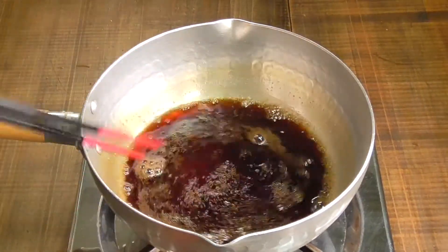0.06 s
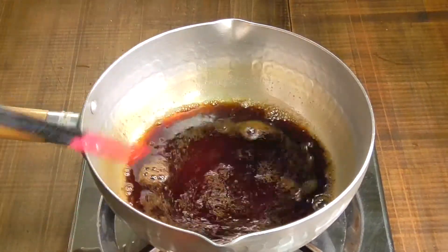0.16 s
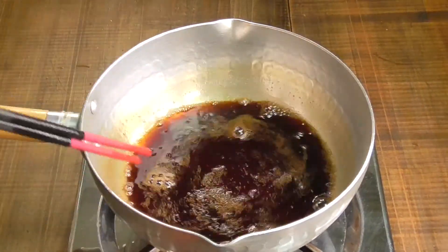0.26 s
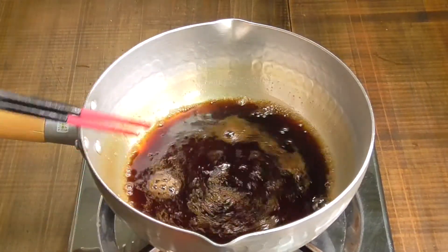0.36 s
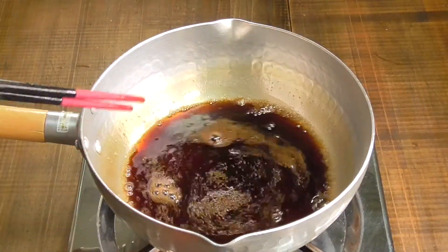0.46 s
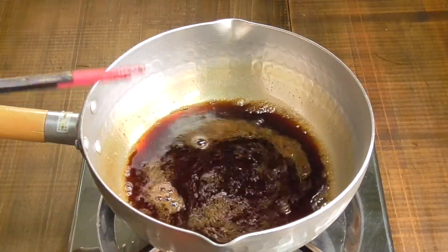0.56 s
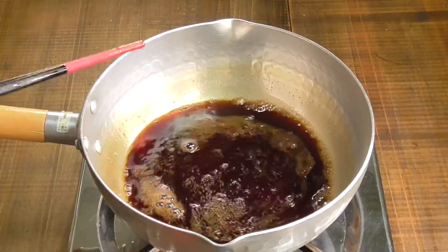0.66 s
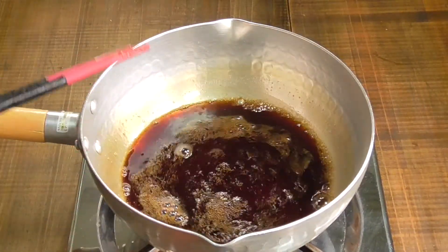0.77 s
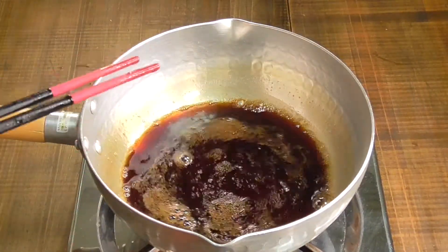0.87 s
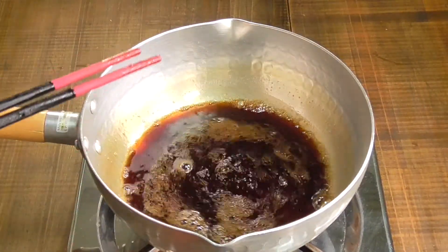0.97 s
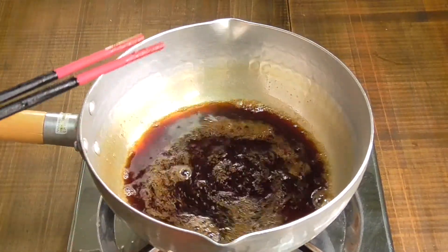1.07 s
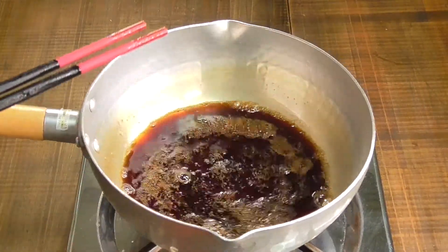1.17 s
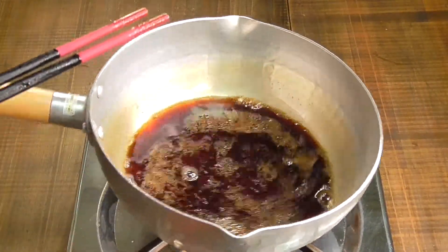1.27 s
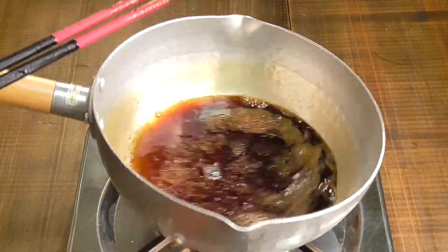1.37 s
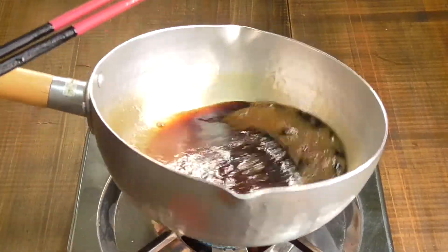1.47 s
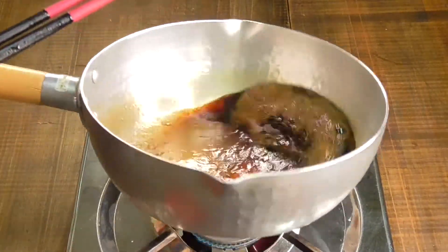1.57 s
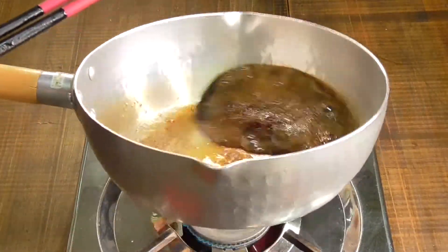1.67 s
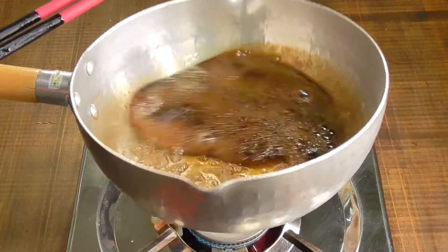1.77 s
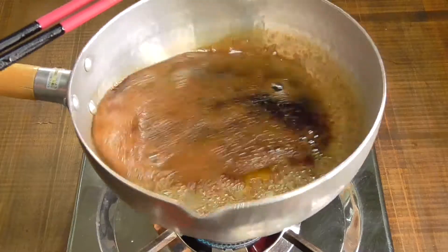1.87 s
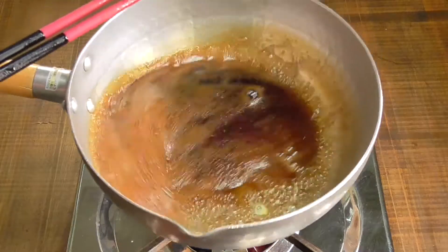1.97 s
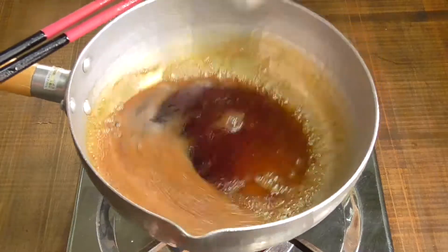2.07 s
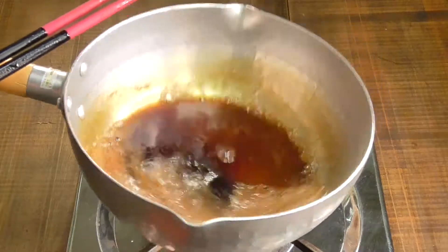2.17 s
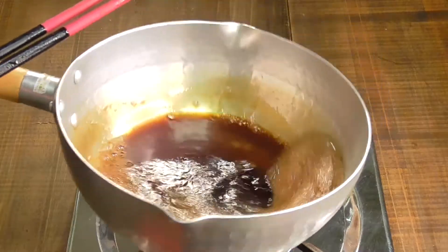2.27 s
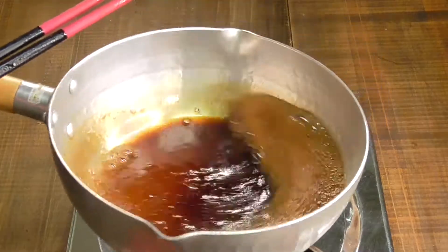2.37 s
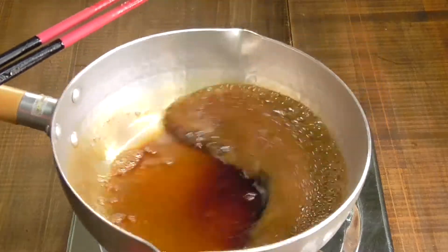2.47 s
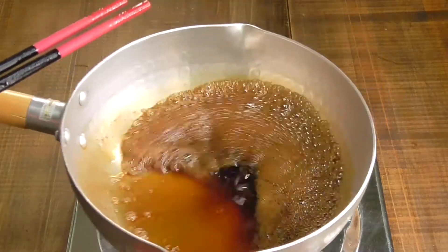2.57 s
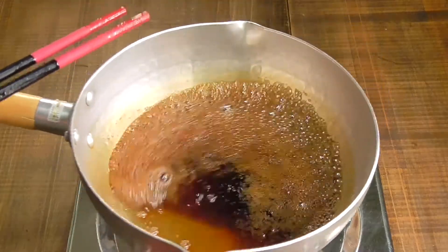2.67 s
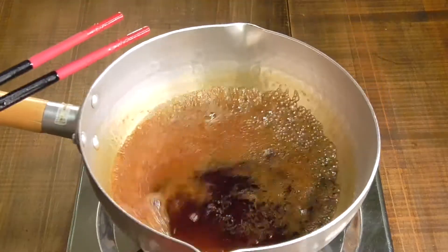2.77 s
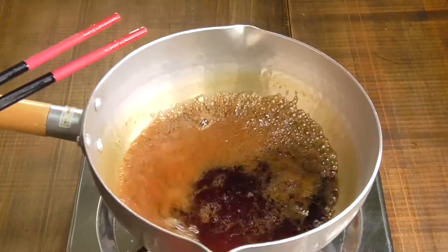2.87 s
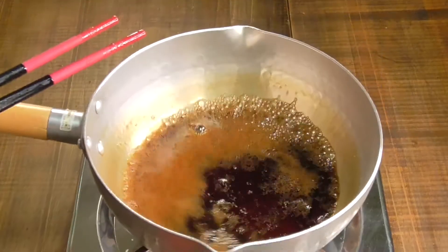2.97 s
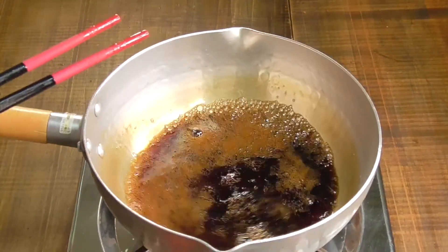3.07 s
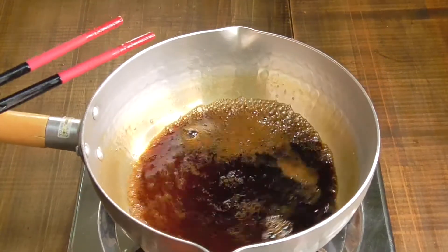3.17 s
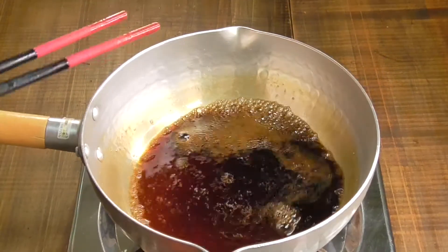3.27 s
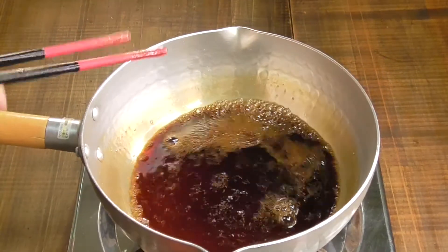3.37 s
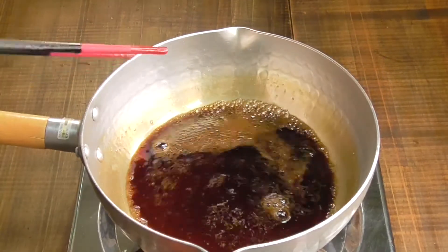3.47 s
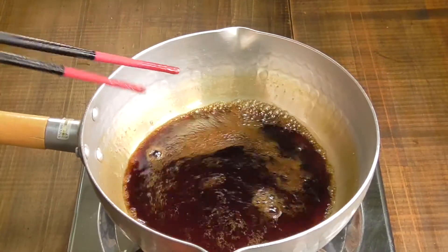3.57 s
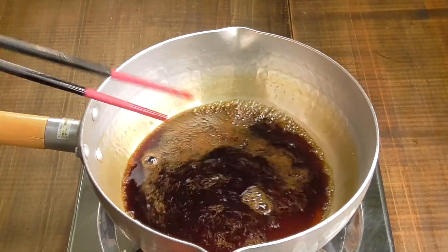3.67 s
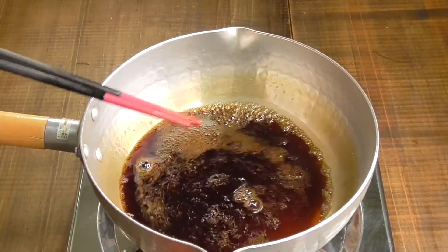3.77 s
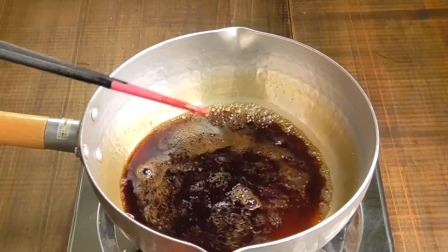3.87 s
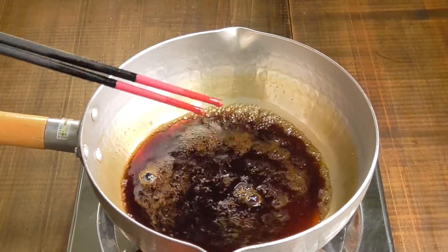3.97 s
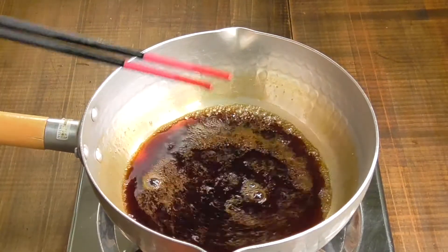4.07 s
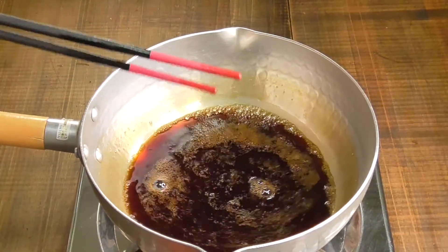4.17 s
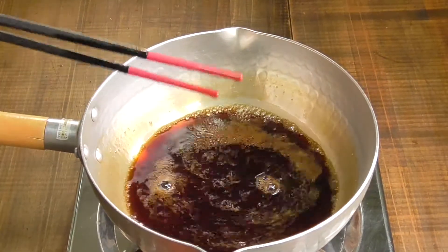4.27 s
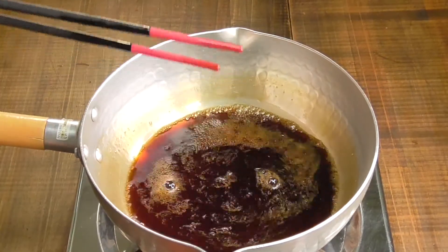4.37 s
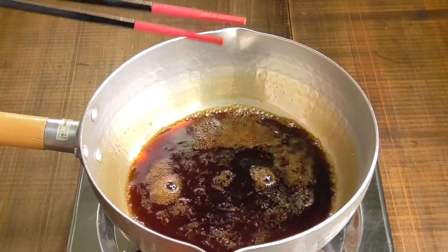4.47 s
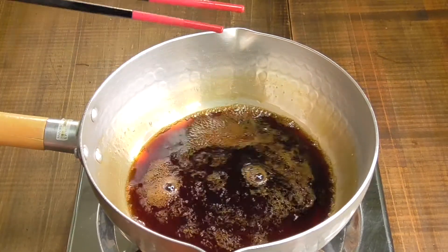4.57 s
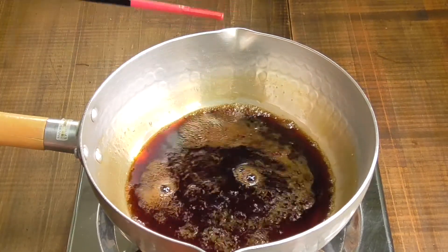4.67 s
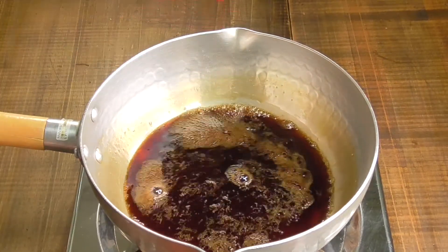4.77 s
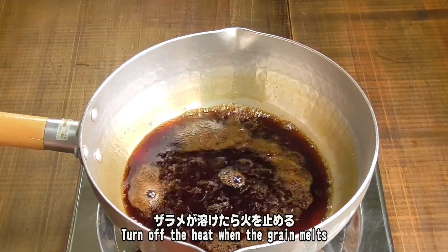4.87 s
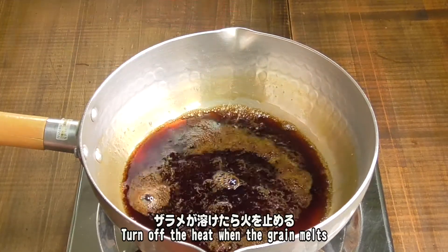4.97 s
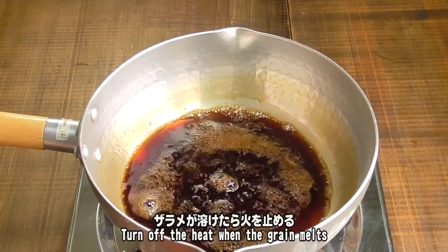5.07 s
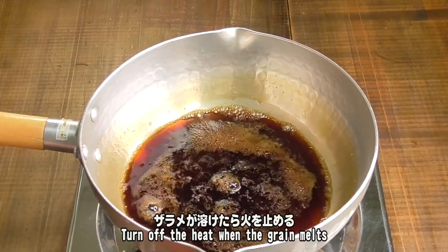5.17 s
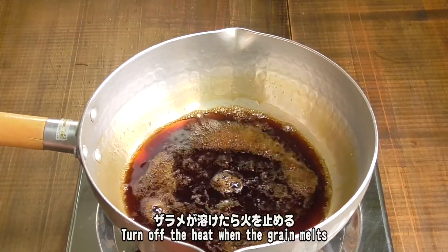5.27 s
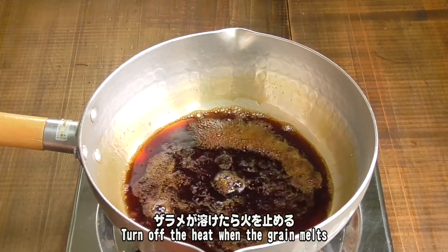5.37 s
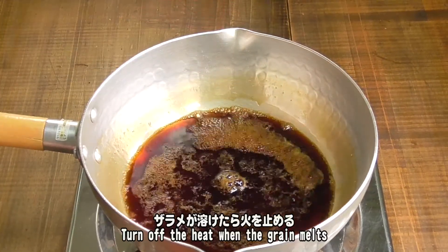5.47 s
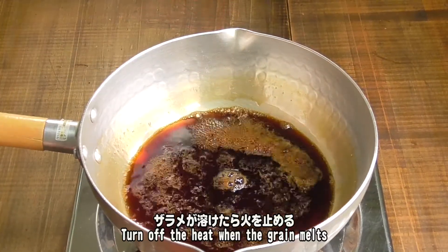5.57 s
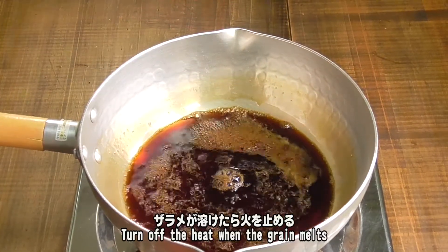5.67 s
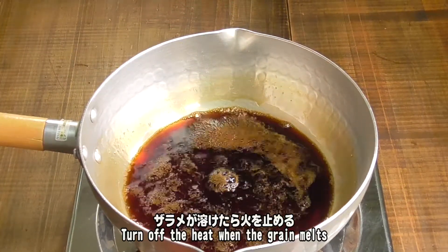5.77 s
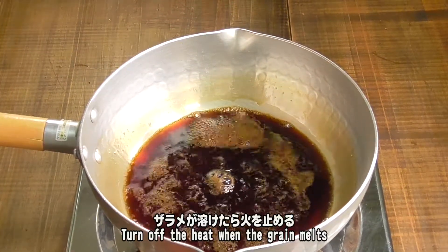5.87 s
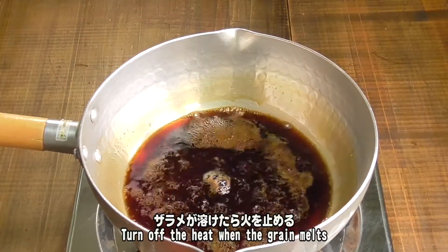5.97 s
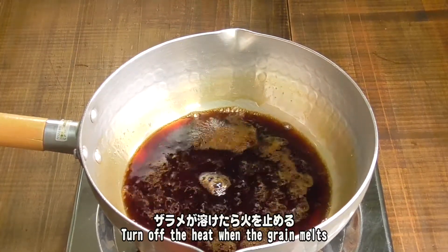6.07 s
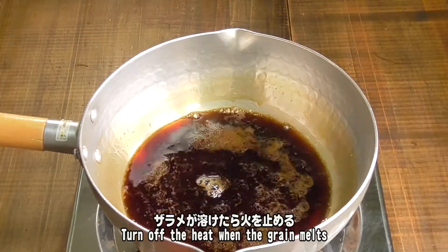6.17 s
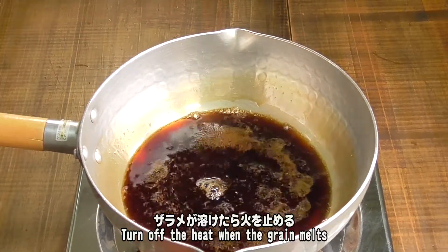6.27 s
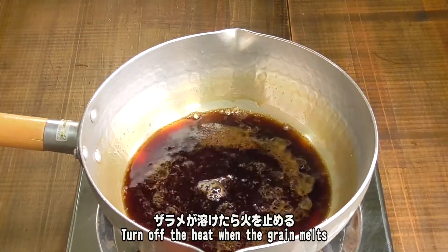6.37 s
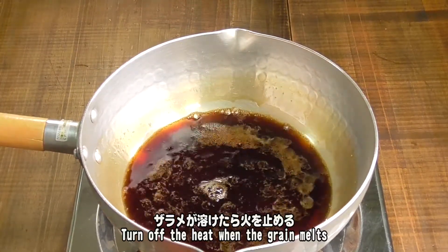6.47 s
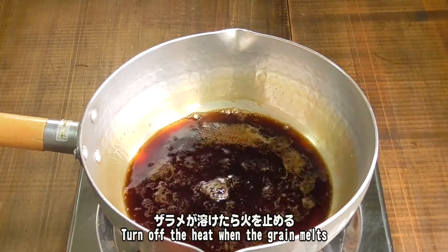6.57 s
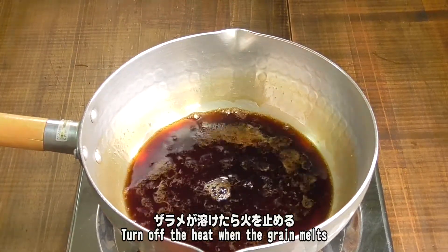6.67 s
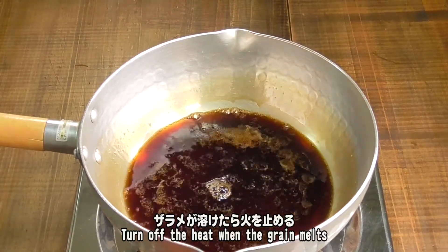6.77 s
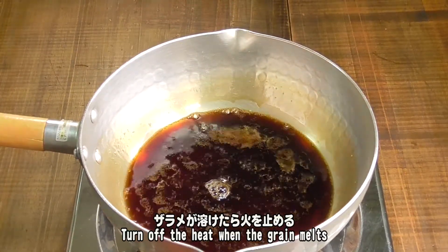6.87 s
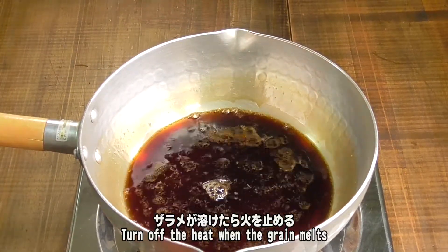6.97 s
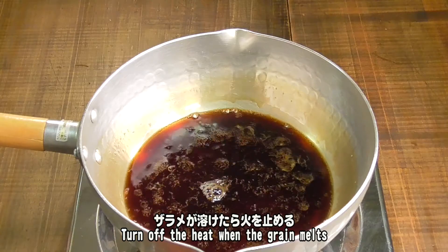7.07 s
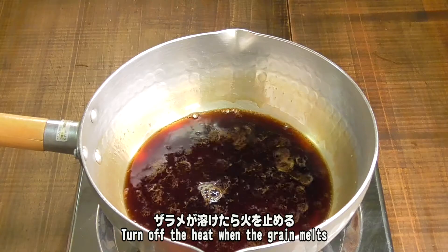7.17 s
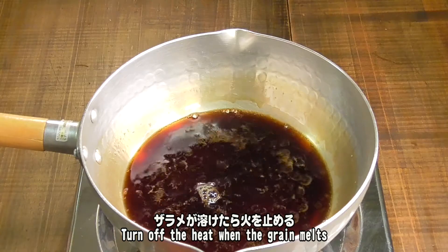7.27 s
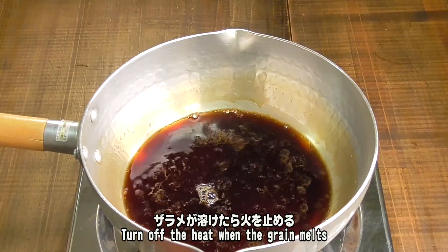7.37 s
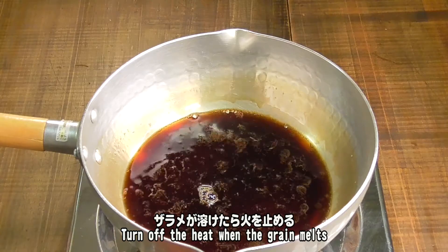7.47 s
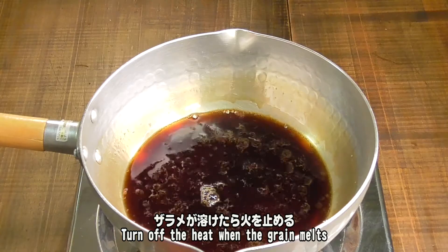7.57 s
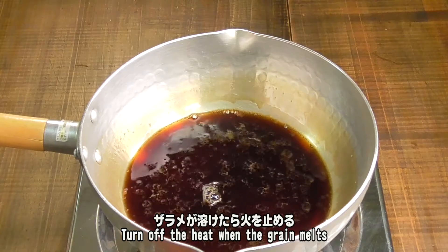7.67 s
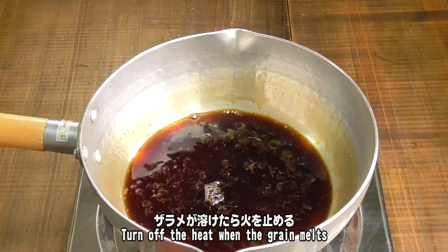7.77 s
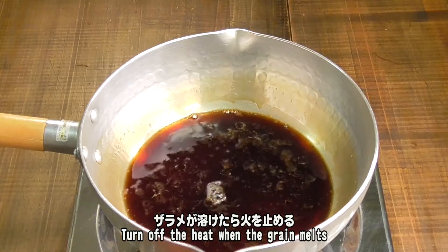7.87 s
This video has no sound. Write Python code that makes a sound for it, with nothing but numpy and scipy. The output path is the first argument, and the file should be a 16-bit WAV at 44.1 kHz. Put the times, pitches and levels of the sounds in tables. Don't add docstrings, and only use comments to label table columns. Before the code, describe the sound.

Sugary sauce boils with steady hiss over a roaring gas burner; a metal pan clanks, is swirled and set down, then the flame clicks off.

```python
import sys
import numpy as np
from scipy import signal
from scipy.fft import rfft, irfft, next_fast_len
from scipy.io import wavfile
from scipy.ndimage import uniform_filter1d, map_coordinates

SR = 44100
rng = np.random.default_rng(int(sys.argv[2]) if len(sys.argv) > 2 else 0)


def magnitude_from_level(level_db):
    exponent = np.asarray(level_db, float) / 20
    return 10 ** exponent


def wrap_up_sound(samples):
    columns = np.atleast_2d(samples).T
    tamed = np.clip(columns, -1, 1)
    steps = np.round(tamed * 32767).astype(np.int16)
    wavfile.write(sys.argv[1], SR, steps)


N = 349404


def seconds(count=N):
    return np.arange(count) / SR


def unit(x):
    return x / np.sqrt(np.mean(x ** 2) + 1e-20)


def along(points, hz):
    point_hz, value = np.transpose(points)
    return np.interp(np.log(hz + 1), np.log(point_hz + 1), value)


def coloured(points):
    return lambda hz: magnitude_from_level(along(points, hz))


def curves(rows):
    s, *columns = np.transpose(rows)
    return [np.interp(seconds(), s, column) for column in columns]


def wobble(rate, count=N):
    knots = rng.standard_normal(int(count * rate / SR) + 4)
    return map_coordinates(knots, [np.arange(count) * rate / SR])


def filtered(x, response):
    n = x.shape[-1]
    m = next_fast_len(n + 8192)
    return irfft(rfft(x, m) * response(np.fft.rfftfreq(m, 1 / SR)), m)[..., :n]


def resonances(modes):
    def response(f):
        total = 0
        for k, (centre, width, db) in enumerate(modes):
            damping = 1j * f * width
            total = total + (-1) ** k * magnitude_from_level(db) * damping / (centre * centre - f * f + damping)
        return total
    return response


# (frequency [Hz], left-right correlation [-1 to 1])
LIKENESS = [(60, 0.14), (130, 0.137), (290, 0.26), (640, 0.56), (1410, 0.56), (3100, 0.82), (6820, 0.54),
            (15000, 0.29)]


def spread(pair, gain):
    def mid_side_gain(hz):
        angle = np.arccos(np.clip(along(LIKENESS, hz), -1, 1)) / 2
        return gain(hz) * np.array([np.cos(angle), np.sin(angle)])
    mid, side = filtered(pair, mid_side_gain)
    return unit(np.array([mid + side, mid - side]))


def patchy(depth_db):
    z = signal.stft(rng.standard_normal((2, N)), nperseg=512)[2]
    field = uniform_filter1d(rng.standard_normal(z.shape[1:]), size=6, axis=0)
    field = uniform_filter1d(field, size=12, axis=1)
    return signal.istft(z * magnitude_from_level(depth_db * unit(field)), nperseg=512)[1][:, :N]


def puff(gain, t60, rise):
    t = seconds(SR // 2)
    noise = unit(filtered(rng.standard_normal(len(t)), gain))
    return noise * magnitude_from_level(-60 * t / t60) * (1 - np.exp(-t / rise))


def crack(spectrum, t60):
    gain = coloured(spectrum)
    return puff(gain, t60, 0.000097) + 1.9 * puff(gain, 0.0068, 0.0001)


def reverb(spectrum, t60):
    left = puff(coloured(spectrum), t60, 0.0014)
    other = puff(coloured(spectrum), t60, 0.0014)
    return np.array([left, 0.19 * left + 1.08 * other])


def add(track, s, sound, pan_db=0):
    part = track[:, round(s * SR):][:, :sound.shape[-1]]
    part += sound[..., :part.shape[1]] * magnitude_from_level(np.array([[0.5], [-0.5]]) * pan_db)


# (frequency [Hz], level [dB per Hz])
AIR = [(15, -27), (40, -17), (70, -10), (110, -3), (175, 0.5), (290, 0), (400, -5), (900, -7),
       (1500, -17.5), (2500, -24.5), (5000, -39), (9000, -22.5), (14000, -24), (16000, -38)]
# (frequency [Hz], rms level [dB])
HUM = [(120, -64.5)]
AIR_DB = -53.5


def background():
    hum = 0
    for hz, db in HUM:
        level = magnitude_from_level(db - 2.0 + 0.42 * wobble(2.66))
        hum = hum + level * np.sin(2 * np.pi * hz * seconds() + 0.34 * wobble(3.28))
    return magnitude_from_level(AIR_DB - 4.0) * spread(patchy(depth_db=1.3), coloured(AIR)) + hum


# (frequency [Hz], t60 [s])
KITCHEN = [(100, 0.16), (700, 0.34), (2500, 0.58), (7000, 0.12), (14000, 0.067)]


def kitchen(x):
    wet, step = np.zeros((2, N + SR)), SR // 3
    for start in range(0, N, step):
        hz, t, z = signal.stft(rng.standard_normal((2, SR // 2)), SR, nperseg=256)
        decay = magnitude_from_level(-60 * t / along(KITCHEN, hz)[:, None])
        tail = signal.istft(z * decay, SR, nperseg=256)[1]
        tail[1] = 0.5 * tail[0] + 0.92 * tail[1]
        tail = tail / np.linalg.norm(tail[0])
        echo = signal.fftconvolve(x[:, start:start + step], tail, axes=1)
        wet[:, start + 130:][:, :echo.shape[1]] += echo
    return wet[:, :N]


# (time [s], peak [dB], centre [Hz], t60 [s])
THUDS = [(1.249, -38, 248, 0.16), (3.291, -35, 1000, 0.11), (4.657, -34.5, 1110, 0.11),
         (4.70, -40, 900, 0.11), (4.934, -43, 230, 0.075), (5.536, -35, 176, .13), (5.59, -51, 171, 0.22),
         (6.178, -36.5, 372, .15), (6.182, -31, 169.2, 0.18), (6.215, -42.5, 148.4, .32),
         (6.245, -47, 225, 0.3), (6.332, -33, 190, 0.17), (6.35, -37.5, 500, 0.18),
         (7.112, -41.5, 660, 0.15)]
# (time [s], peak [dB], centre [Hz], rise [s])
SHUFFLES = [
    (3.32, -30.5, 474, 0.017),
    (6.089, -33.5, 331.7, 0.27),
    (7.02, -42, 605, .014),
    (7.17, -46, 148.6, 0.015),
    (7.745, -46, 148, 0.02),
]
# (time [s], level [dB], frequency [Hz], t60 [s])
PANEL = [
    (2.91, -35.5, 120, 0.48),
    (4.94, -49, 120, .7),
    (3.23, -45, 440, .4),
    (6.2, -43, 97, 0.41),
    (6.375, -41.5, 275, 0.48),
]
# (centre [Hz], width [Hz], level [dB])
TABLE = [(121, 30, 2.5), (190, 57, -5), (276, 19, 3.5), (398, 25, 1)]
THUD_RISE_S, PANEL_RISE_S, TABLE_PAN_DB = 0.0046, 0.013, -1.2
SHUFFLE_T60_S, T60_PER_RISE = 0.12, 2.9


def thuds():
    track, wood, t = np.zeros((2, N)), resonances(TABLE), seconds(SR // 2)
    contacts = [(s, db, hz, THUD_RISE_S, t60) for s, db, hz, t60 in THUDS]
    contacts += [(s, db, hz, rise, SHUFFLE_T60_S + T60_PER_RISE * rise) for s, db, hz, rise in SHUFFLES]
    for s, db, hz, rise, t60 in contacts:
        lump = resonances([(hz, 0.93 * hz, 0)])

        def colour(f):
            scuff = magnitude_from_level(-19.5) * (f < 9000) / (1 + f / 2500)
            return lump(f) ** 2 * (0.47 + np.abs(wood(f))) + scuff

        noise = puff(colour, t60, rise)
        swing = sum(np.sin(2 * np.pi * ratio * hz * t) for ratio in (0.82, 1.01, 1.33))
        swing = swing * magnitude_from_level(-60 * t / t60) * (1 - np.exp(-t / rise))
        swing = swing / (1 + (hz / 330) ** 3)
        add(track, s, magnitude_from_level(db) * (0.88 * noise + swing), TABLE_PAN_DB)
    for s, db, hz, t60 in PANEL:
        envelope = magnitude_from_level(db - 60 * t / t60) * (1 - np.exp(-t / PANEL_RISE_S))
        add(track, s, envelope * np.sin(2 * np.pi * hz * t))
    return track


# (time [s], peak [dB], centre [Hz], length [s])
SLIDES = [
    (7.104, -45.5, 560, 0.12),
    (7.785, -43, 396, .1),
]
# (time [s], level [dB])
CHINKS = [
    (7.872, -49.5),
    (7.897, -53),
    (7.914, -52),
]
# (centre [Hz], width [Hz], level [dB])
CROCKERY = [(1550, 300, 1), (2500, 300, 1), (3770, 300, -2), (5200, 400, -8)]
SLIDE_WIDTH, CHINK_T60_S = 0.74, 0.054


def slides():
    track, t = np.zeros((2, N)), seconds(SR // 4)
    for s, db, hz, length in SLIDES:
        lump = resonances([(hz, SLIDE_WIDTH * hz, 0)])
        rub = unit(filtered(rng.standard_normal(len(t)), lambda f: lump(f) ** 2))
        swell = np.sin(np.pi * np.minimum(t / length, 1)) ** 1.3
        add(track, s, magnitude_from_level(db) * rub * swell, TABLE_PAN_DB)
    for s, db in CHINKS:
        add(track, s, magnitude_from_level(db) * puff(resonances(CROCKERY), CHINK_T60_S, 0.0008), TABLE_PAN_DB)
    return track


# (frequency [Hz], level [dB], t60 [s])
LATCH = [(6970, -7.5, 0.026), (7720, 1, 0.014), (8660, -5, 0.022), (11100, 7.5, 0.0066),
         (12340, -4.5, 0.0091), (14500, -4, .008)]
# (time [s], level [dB])
VALVE = (5.2023, -4.5)


def valve():
    track, t = np.zeros((2, N)), seconds(SR // 10)
    snap_s, snap_db = VALVE
    for side, lag in enumerate((0, 0.000018)):
        ring = sum(magnitude_from_level(db - 60 * t / t60) * np.sin(2 * np.pi * hz * (t - lag)) for hz, db, t60 in LATCH)
        ring = magnitude_from_level(snap_db - 6.5) * ring * (1 - np.exp(-t / 0.00021))
        track[side, round(snap_s * SR):][:len(t)] = ring
    return track


# (time [s], peak [dB], body [dB], echo [dB])
TICKS = [
    (.184, -17, -45, -16.5),
    (3.8347, -29, -36, -12),
    (4.004, -20, -47, -16.5),
    (4.199, -38, -40, -16),
    (5.0747, -29, -40, -16),
]
# (time [s], peak [dB], body [dB], echo [dB])
SHUT = [
    (5.2023, -7, -26, -4.5),
]
# (time [s], peak [dB], body [dB], echo [dB])
RATTLES = [
    (4.6533, -28.5, -5.5, -5),
    (4.8543, -36, -3.5, 0.5),
    (4.9341, -38.5, -2.5, -5),
    (5.0747, -29, -13, -5),
    (5.5737, -32.5, -8.5, -3),
    (6.1861, -42.5, -3.5, 12.5),
    (6.3335, -41.5, 2, 13),
]
# (frequency [Hz], level [dB per Hz])
STICK = [(1180, -55), (2000, -28), (4750, -6), (6080, -16), (7200, -4), (9210, 2), (14100, -13),
         (15600, -19), (16500, -34)]
# (frequency [Hz], level [dB per Hz])
SNAP = [(880, -61.5), (1500, -69), (2200, -14), (3180, -16), (3480, -14), (5640, -14), (6820, 1.5),
        (9890, -8), (10900, -13), (13900, -8), (16500, -30)]
# (frequency [Hz], level [dB per Hz])
KNOB = [(1060, -36), (1800, -12), (4160, 1), (4890, 1), (6070, -9), (7890, -1), (13900, -24), (15500, -29)]
# (frequency [Hz], level [dB per Hz])
ECHO = [(710, -20), (1200, -3.5), (1600, -13.5), (3540, -7.5), (5850, -10.5), (7170, -4.5), (11000, -8),
        (14500, -19), (15500, -27)]


def ticks():
    track = np.zeros((2, N))
    kinds = [(TICKS, STICK, 0.011, 3.5), (SHUT, SNAP, 0.037, 0), (RATTLES, KNOB, 0.076, 3)]
    for events, colour, t60, pan_db in kinds:
        for s, db, body_db, echo_db in events:
            body = puff(resonances([(900, 610, 18.0), (2350, 5600, 0.5)]), 0.37, 0.00043)
            click = crack(colour, t60) + magnitude_from_level(body_db + 5.5) * body
            click = click + magnitude_from_level(echo_db - 8.5) * reverb(ECHO, t60=0.57)
            add(track, s, magnitude_from_level(db - 10.0) * click, pan_db)
    return track


# (time [s], peak [dB], clank [dB], ring length [factor])
LIFTS = [
    (1.138, -33, -17, 1),
    (1.2425, -9, -16.5, 0.48),
    (1.344, -36, -17, 0.73),
]
# (time [s], peak [dB], clank [dB], ring length [factor])
LANDINGS = [
    (1.452, -31.5, -28, 0.6),
    (1.466, -27.5, -35, 0.58),
    (2.8985, -12.5, -7.5, 1.11),
    (3.289, -17.5, -30, 0.49),
]
# (time [s], peak [dB], clank [dB], ring length [factor])
SETTLING = [
    (3.106, -9.5, -12.5, 0.71),
]
# (frequency [Hz], level [dB], t60 [s])
LEAVING = [(544, -34, 0.36), (677, 0, 0.18), (717.6, -4, 0.32), (851, -1, 0.21), (1000, -15, 0.34),
           (1166, -11.5, 0.24), (1256, -10.5, 0.13), (1430, -20, 0.16), (1933, -29, 0.34)]
# (frequency [Hz], level [dB], t60 [s])
TRIVET = [(549, -13, 0.28), (626, -9, 0.28), (739, -8, .18), (847, -12, 0.45), (1000, -14, 0.37),
          (1171, -11, 0.43), (1242, -7, 0.16), (1368, -16, 0.23), (1810, -21.5, 0.22)]
# (frequency [Hz], level [dB], t60 [s])
SEATED = [(480, -19, 0.61), (644, -27, 0.41), (714, 4, 0.12), (744, 0, 0.17), (823, -6, .1),
          (871, -12, 0.27), (933, -29, 0.6), (1190, -7, 0.14), (1155, -19, 0.16), (1287, -15, 0.3),
          (1473, -21, 0.073)]
# (frequency [Hz], level [dB per Hz])
CLANK = [(880, -49), (1500, -7), (3150, -6), (3380, -8), (3740, -6), (5870, -9), (8340, -4.5),
         (13600, -12.5), (15400, -34), (16500, -69)]
THUMP_DB, CLANK_ECHO_DB = -27, -11


def clangs():
    body, bright = np.zeros((2, 2, N))
    t = seconds(SR // 2)
    for events, modes in ((LIFTS, LEAVING), (LANDINGS, TRIVET), (SETTLING, SEATED)):
        for s, db, clank_db, ring in events:
            metal = 0
            for hz, level, t60 in modes:
                chatter = 1 + 1.4 * wobble(110, count=len(t)) * np.minimum(t / 0.04, 1)
                metal = metal + magnitude_from_level(level - 60 * t / (ring * t60)) * chatter * np.sin(2 * np.pi * hz * t)
            metal = metal * (1 - np.exp(-t / 0.00037))
            rattle = puff(resonances([(767, 208, 13.4), (1180, 740, 5.6)]), 0.28 * ring, 0.0017)
            thump = puff(resonances(TABLE), 0.35, 0.0085)
            low = magnitude_from_level(db - 8.5) * metal + magnitude_from_level(db - 14) * rattle + magnitude_from_level(db + THUMP_DB - 0.5) * thump
            add(body, s, low)
            clank = crack(CLANK, t60=0.051) + magnitude_from_level(CLANK_ECHO_DB) * reverb(CLANK, t60=0.39)
            add(bright, s, magnitude_from_level(db + clank_db + 0.5) * clank)
    return body, bright


# (time [s], level [dB])
BOIL = [(0, -51.5), (1.1, -50.5), (1.4, -51.5), (2.9, -51), (3.5, -51.5), (4.3, -51.5), (5.2, -51),
        (5.4, -52.5), (5.7, -52.5), (5.9, -55), (6.3, -52), (6.46, -57.5), (7.12, -58.5), (7.24, -65),
        (7.7, -66), (7.77, -61), (7.92, -62)]


def boil_db():
    return curves(BOIL)[0]


SWIRL_S, SWIRL_WIDTH_S = 2.08, 0.36


def swirl():
    return np.exp(-0.5 * ((seconds() - SWIRL_S) / SWIRL_WIDTH_S) ** 2)


# (frequency [Hz], level [dB per Hz])
FLAME = [(150, -37), (330, -2), (520, 3), (570, -4.5), (1100, -2.5), (1600, -3), (1720, -4.5), (2600, -5.5),
         (4000, -51), (6000, -120)]
# (centre [Hz], width [Hz], level [dB])
BURNER = [(563.5, 7.1, 4), (644, 52, -1), (760, 33, -5.5), (844, 23.5, -0.5), (1011, 23.5, -0.5),
          (1136, 51, -9.5), (1306, 130, -9.5), (1544, 98, -9)]
# (time [s], pitch [Hz], level [dB])
GAP = [(1.5, 654, -50.5), (1.7, 804, -47), (1.8, 851, -47.5), (1.95, 696, -54.5), (2.11, 743, -48),
       (2.28, 660, -59), (2.58, 733.6, -52), (2.71, 646, -51.5), (2.88, 670, -55)]
ROAR_DB, FULL_BOIL_DB = -51, -51
ROAR_GROWS, LIFTED_DB = 1.36, -1.1


def flame():
    body = resonances(BURNER)
    roar = spread(patchy(depth_db=1.5), lambda hz: magnitude_from_level(along(FLAME, hz)) * (0.13 + np.abs(body(hz))))
    pitch_hz, level_db = curves(GAP)
    first, last = GAP[0][0], GAP[-1][0]
    lifted = np.interp(seconds(), [first - 0.05, first, last, last + 0.026], [0, 1, 1, 0])
    phase = 2 * np.pi * np.cumsum(pitch_hz) / SR

    def narrow_noise(width_hz):
        return wobble(width_hz) * np.sin(phase) + wobble(width_hz) * np.cos(phase)

    note = narrow_noise(50) + 0.6 * narrow_noise(260)
    note = note + magnitude_from_level(-9) * wobble(260) * np.sin(2 * np.pi * 1500 * seconds())
    flicker_db = 0.8 * wobble(11)
    roar_db = ROAR_DB + ROAR_GROWS * (boil_db() - FULL_BOIL_DB) + LIFTED_DB * swirl()
    return magnitude_from_level(roar_db - 2.5 + flicker_db) * roar + lifted * magnitude_from_level(level_db - 3.5) * note


# (frequency [Hz], level [dB per Hz])
FIZZ = [(1060, -54), (1800, -8.5), (2110, -6.5), (2450, -6), (2950, -7), (4540, -0.5), (6460, -5.5),
        (7250, -1), (9690, -0.5), (12500, -4), (13900, -7.5), (14800, -11.5)]
SWIRL_DB = 5


def sauce():
    bursts = rng.random((2, N)) < 0.03
    size_db = 2.2 * rng.exponential(size=(2, N))
    pops = bursts * rng.standard_normal((2, N)) * magnitude_from_level(size_db)
    fizz = spread(patchy(depth_db=1.0) + 0.32 * unit(pops), coloured(FIZZ))
    return magnitude_from_level(boil_db() + SWIRL_DB * swirl() + 0.45 * wobble(14)) * fizz


def scene():
    metal, clank = clangs()
    soft = thuds() + slides()
    knocks = metal + soft + kitchen(magnitude_from_level(-8) * metal + magnitude_from_level(-8.5) * soft)
    knocks = filtered(knocks, lambda hz: (1j * hz / (1j * hz + 75)) ** 2)
    return knocks + clank + ticks() + valve() + sauce() + flame() + background()


# (frequency [Hz], left minus right [dB])
LEAN = [(100, -2), (380, -1.5), (700, -1), (1290, 0), (2380, 1), (4400, 2), (8120, 3), (11000, -3),
        (15000, -5)]


def top_cut(x):
    return signal.sosfilt(signal.butter(12, 16800, fs=SR, output="sos"), x)


def record(dry):
    ports = filtered(dry, lambda hz: magnitude_from_level(np.outer([0.5, -0.5], along(LEAN, hz))))
    return top_cut(ports)


dry = scene()
out = record(dry)
wrap_up_sound(out)
```